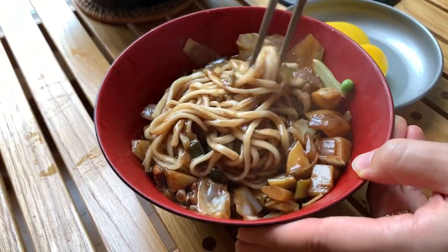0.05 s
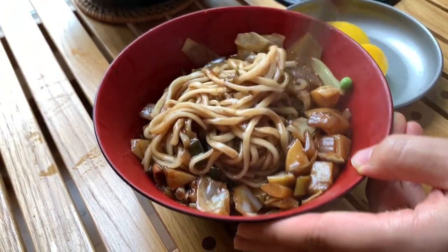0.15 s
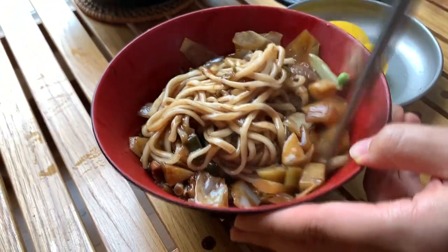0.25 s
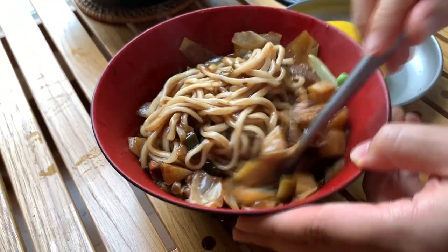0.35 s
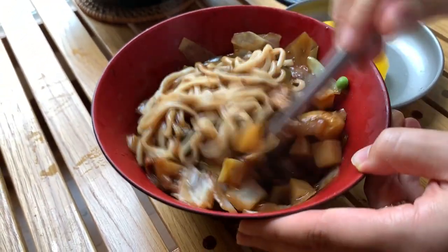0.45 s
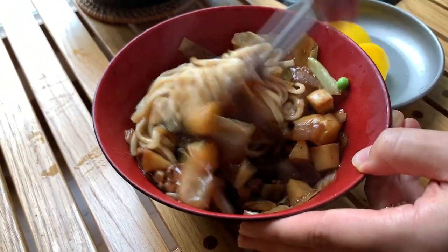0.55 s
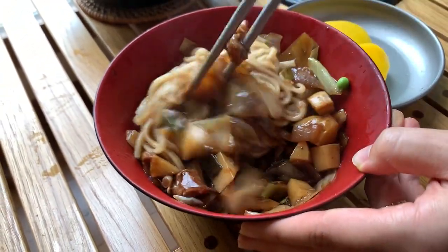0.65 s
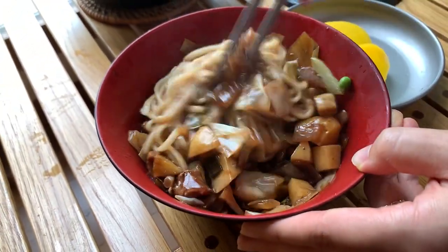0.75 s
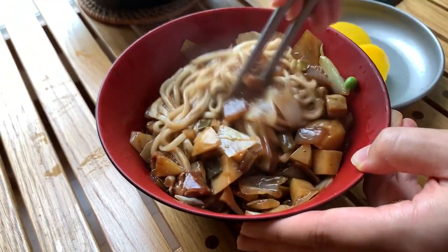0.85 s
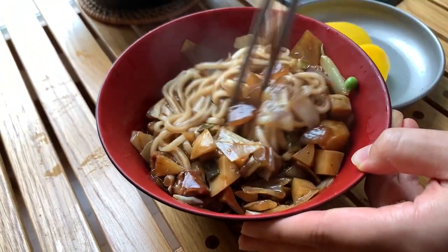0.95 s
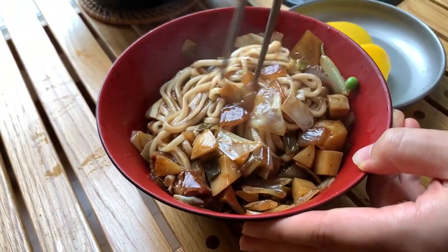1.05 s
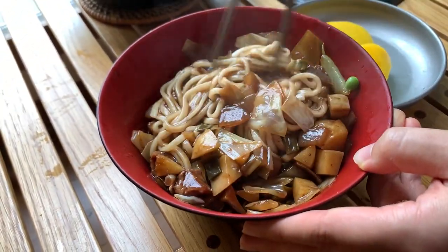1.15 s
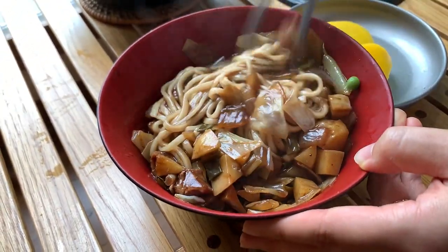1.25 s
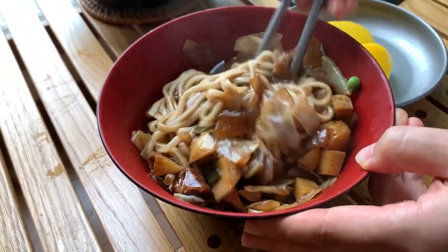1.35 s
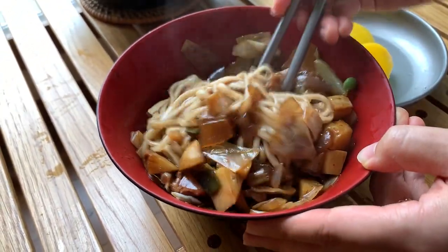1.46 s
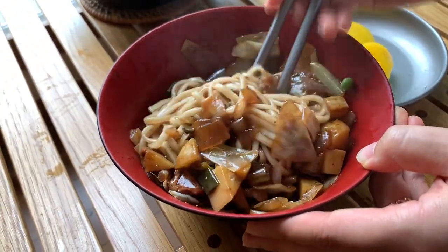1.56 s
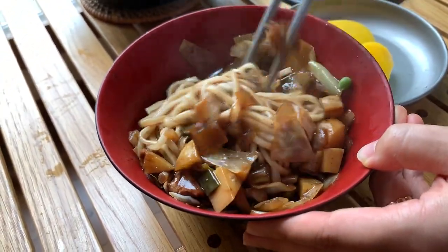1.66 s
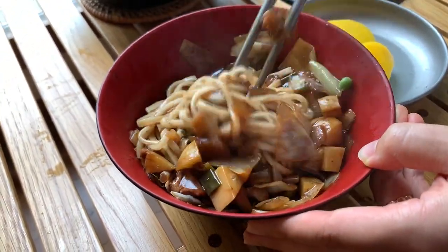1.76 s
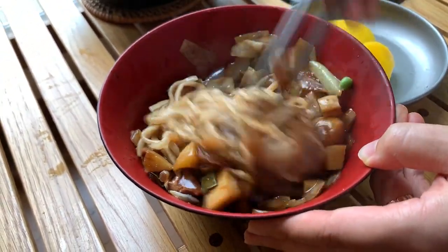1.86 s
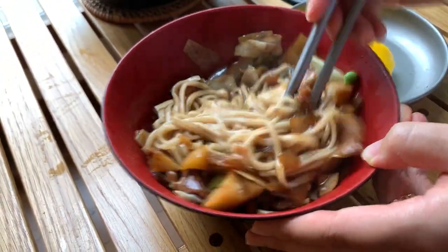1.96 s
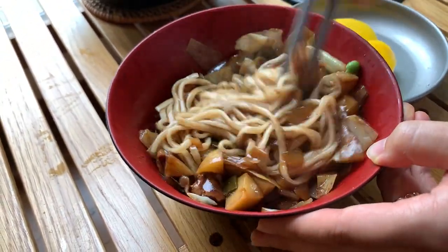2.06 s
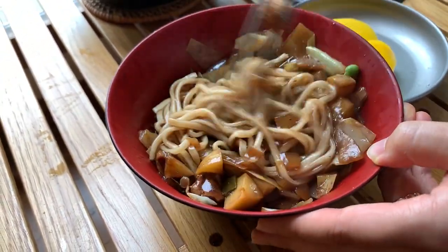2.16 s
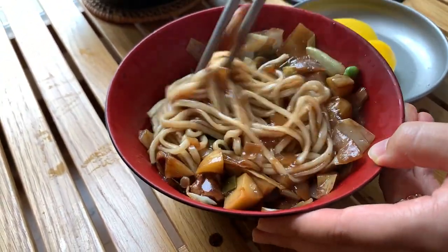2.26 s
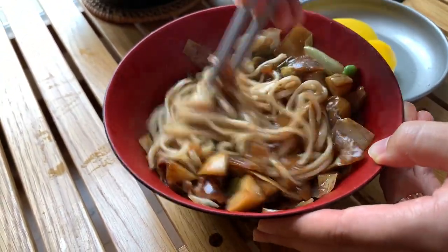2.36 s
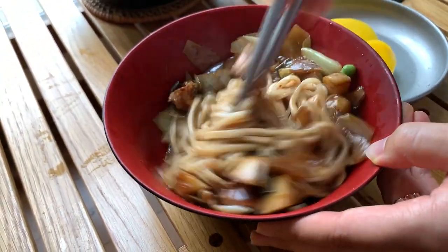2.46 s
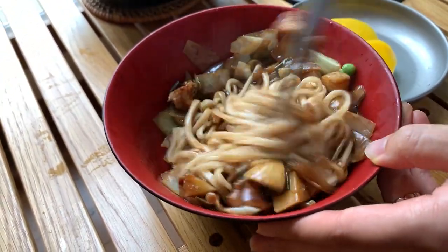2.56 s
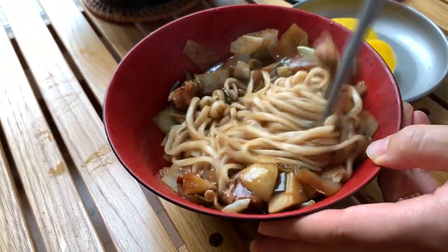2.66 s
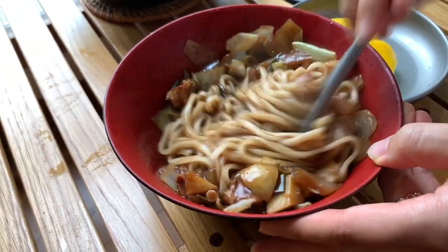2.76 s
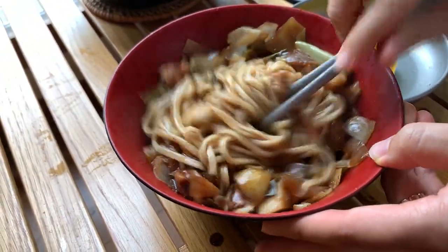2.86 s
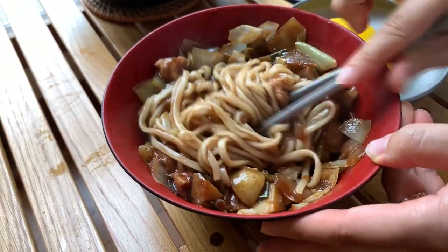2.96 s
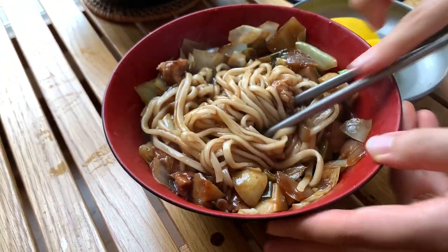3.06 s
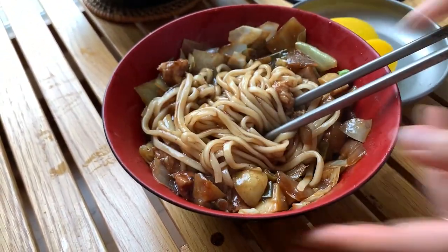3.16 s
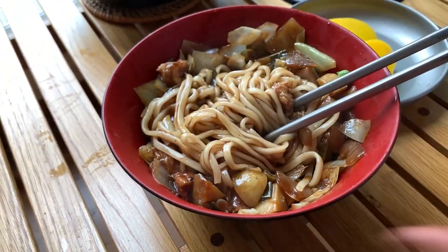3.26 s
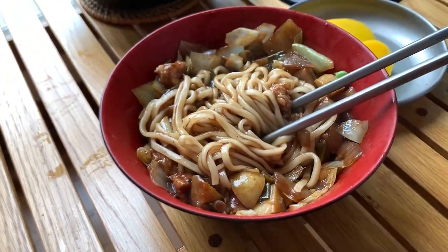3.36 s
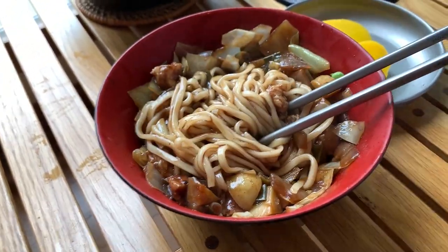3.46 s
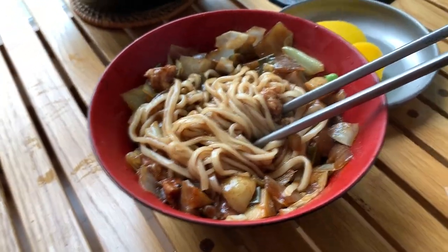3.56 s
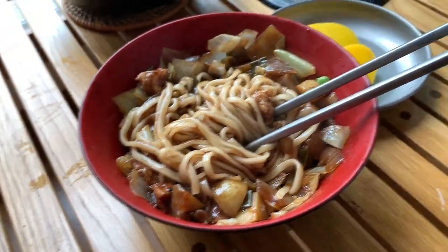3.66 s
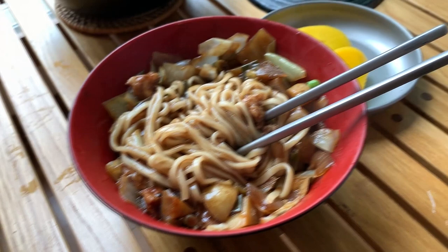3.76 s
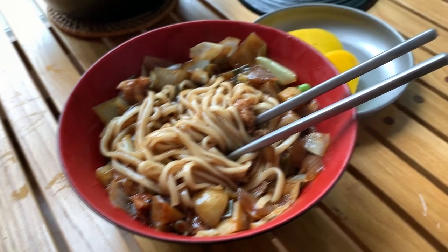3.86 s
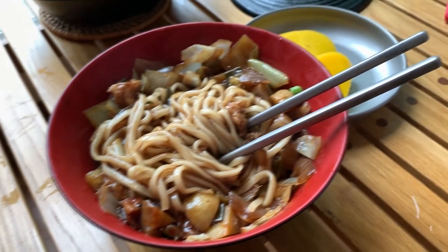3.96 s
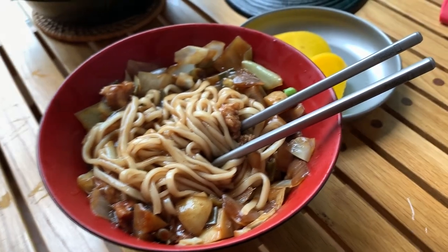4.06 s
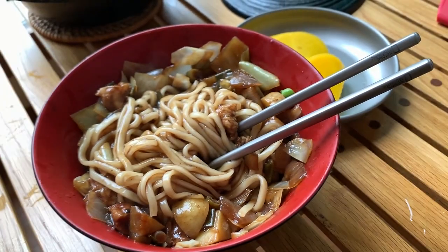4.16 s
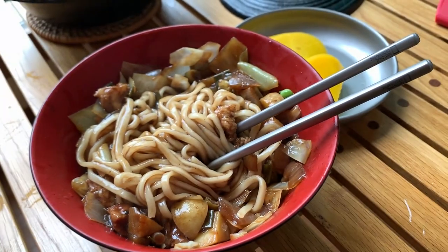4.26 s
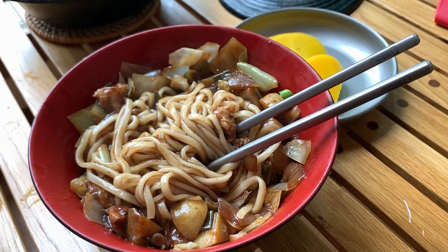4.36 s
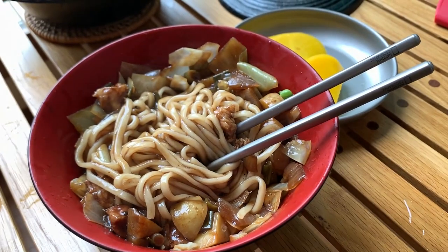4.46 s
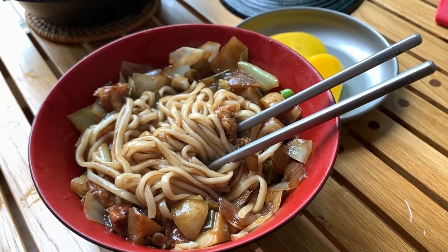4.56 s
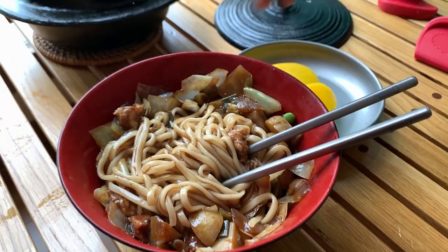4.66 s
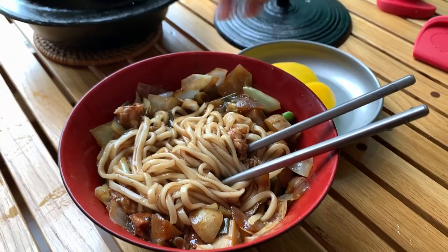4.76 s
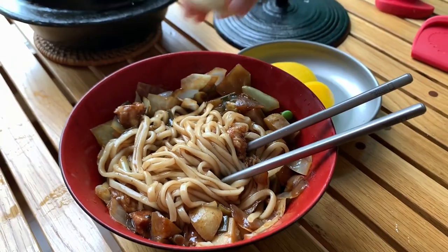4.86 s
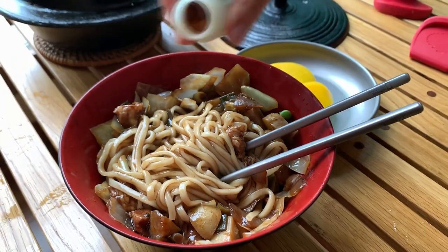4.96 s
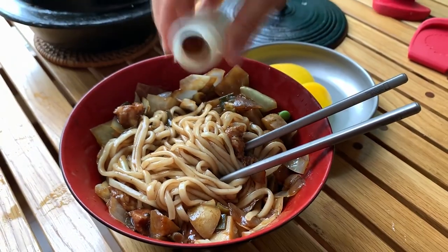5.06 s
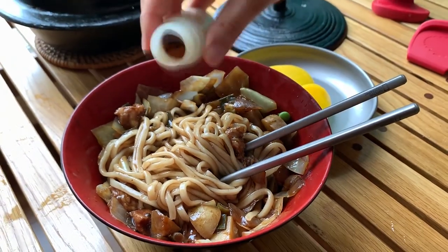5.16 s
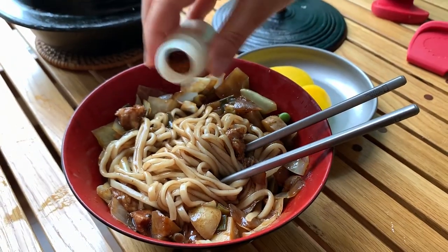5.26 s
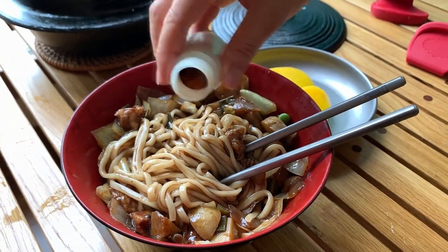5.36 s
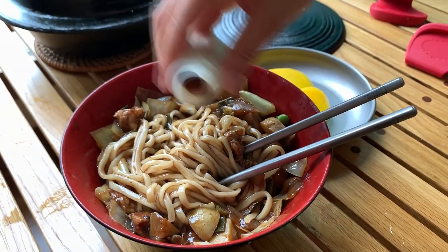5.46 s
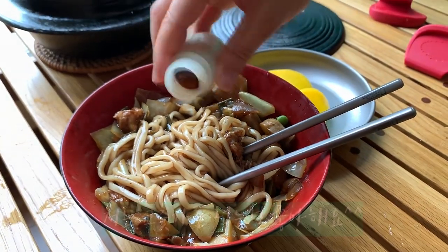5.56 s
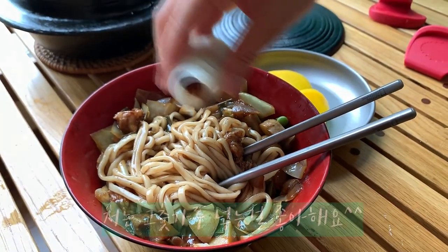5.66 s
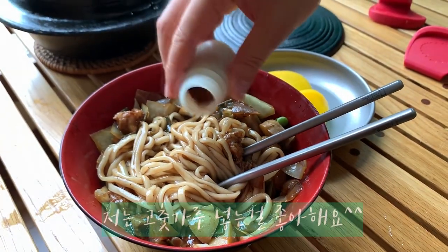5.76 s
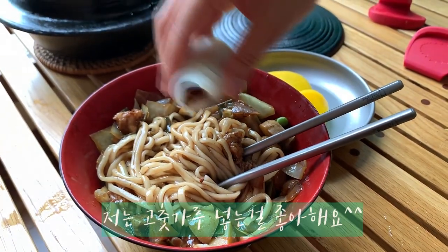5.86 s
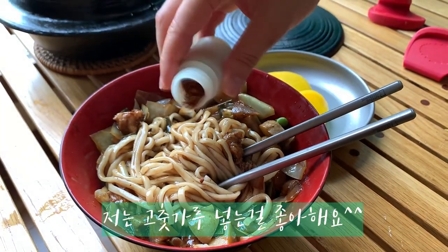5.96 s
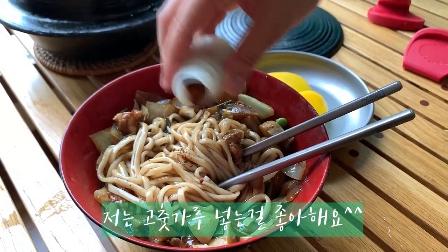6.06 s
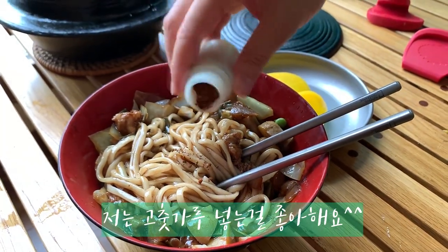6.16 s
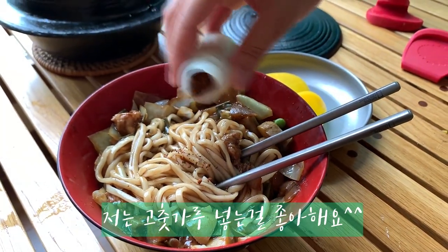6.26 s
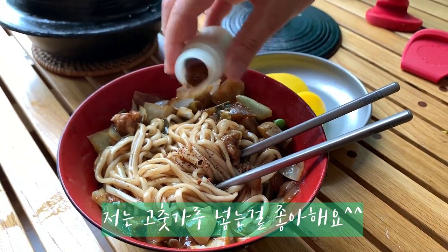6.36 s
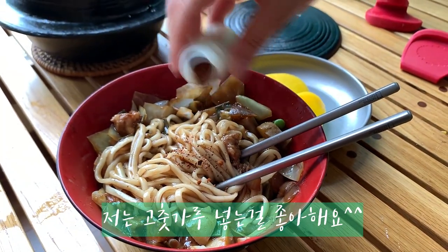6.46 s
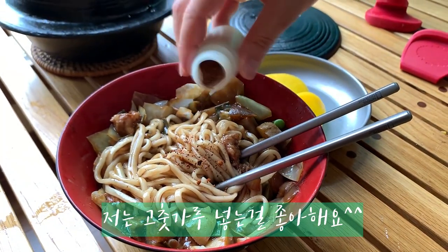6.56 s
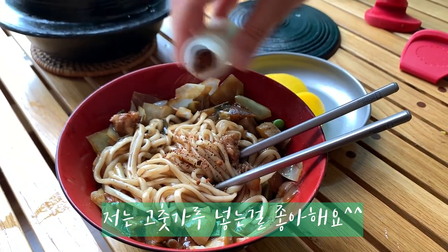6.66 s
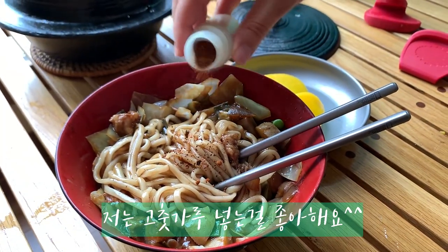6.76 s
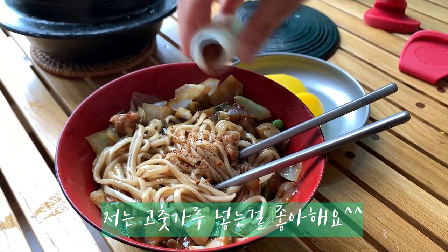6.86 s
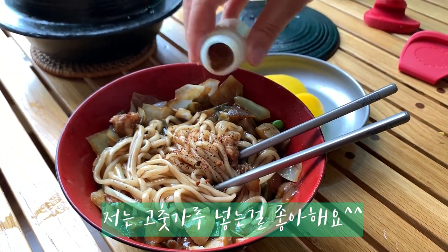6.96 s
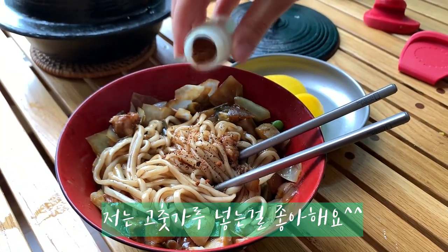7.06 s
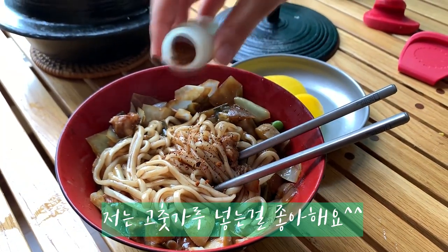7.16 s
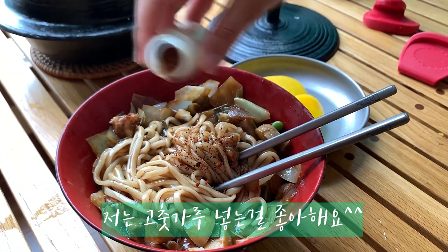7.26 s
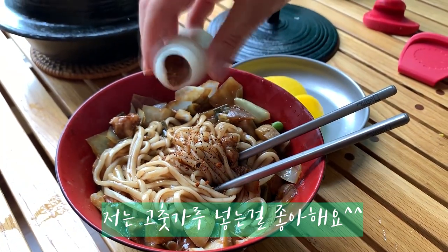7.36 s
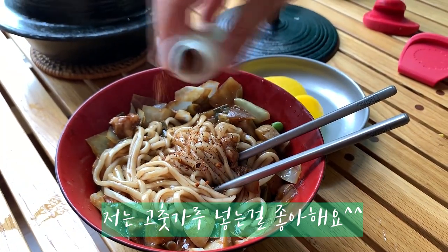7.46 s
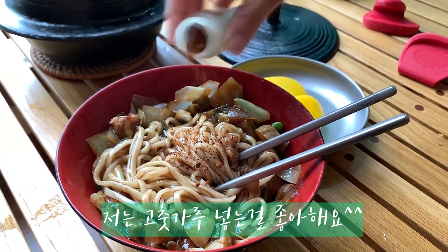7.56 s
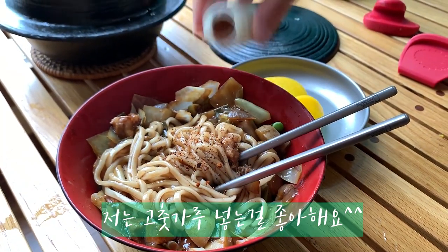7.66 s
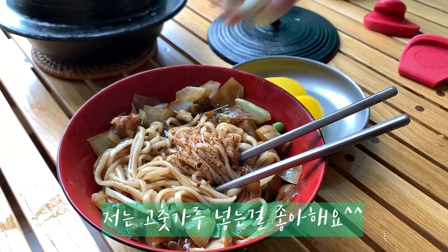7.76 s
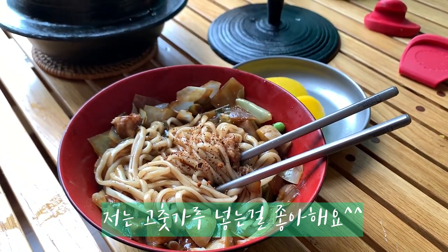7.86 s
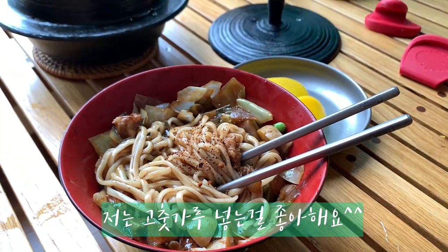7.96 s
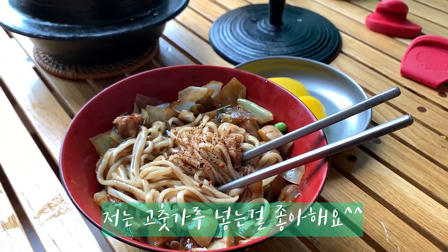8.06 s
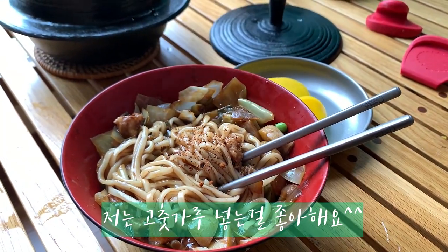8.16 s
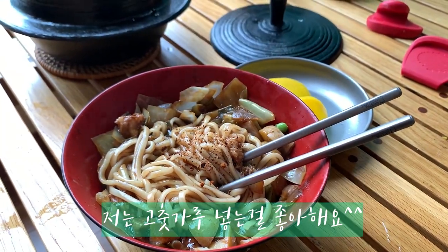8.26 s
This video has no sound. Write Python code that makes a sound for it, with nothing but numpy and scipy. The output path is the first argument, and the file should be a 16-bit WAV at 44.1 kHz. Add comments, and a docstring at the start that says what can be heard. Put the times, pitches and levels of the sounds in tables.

```python
"""Steel chopsticks turn sauced noodles in a bowl, click on its wall and are laid down: struck modes with cracks of
contact, over snapping sauce films, squelch and groans. Then a pepper shaker swishes, ticks and clinks.
Metal clatters nearby (noise-driven modes, beating tones); the wooden table takes bumps and knocks (modes).
Shaped noise makes a rain-like hiss and a far rush, noise and sines a low hum. Two close microphone ports hear it."""
import sys
import numpy as np
from scipy import signal
from scipy.fft import rfft, irfft, next_fast_len
from scipy.io import wavfile
from scipy.ndimage import uniform_filter1d

SR = 44100
rng = np.random.default_rng(int(sys.argv[2]) if len(sys.argv) > 2 else 0)


def persist_wave(psi):
    """Save psi, clipped to +-1, as 16-bit WAV."""
    counts = np.round(np.clip(psi, -1, 1) * 32767).astype(np.int16)
    wavfile.write(sys.argv[1], SR, np.atleast_2d(counts).T)


N = 366471
T = np.arange(N) / SR  # scene time [s]
AGE = T[:SR // 2]  # time since a hit [s]

# steel on crockery: (time [s], touched bowl spot [Hz], bowl level [dB], touched steel spot [Hz], steel level [dB],
# tip level [dB], tip pitch [Hz], bowl lean to the left [dB])
CLICKS = [(0.2877, 1440, -29, 3300, -21, -17.5, 8240, 17), (0.358, 1250, -36, 2900, -43, -48, 7900, 5),
          (0.8245, 855, -18, 3170, -23.5, -27, 7900, 2), (1.297, 1290, -29, 3200, -20, -26.5, 8500, 5),
          (1.321, 1150, -24, 3000, -30, -44, 8500, 2), (1.9907, 1080, -32, 3500, -34.5, -41.5, 8500, 5),
          (2.3482, 1470, -25, 2150, -27.5, -34, 8100, 12), (2.7835, 700, -29.5, 3000, -32, -43, 6900, 4),
          (2.7845, 1460, -26.5, 2610, -35, -42, 8150, 4), (2.810, 1480, -33.5, 3000, -43, -48, 8400, 3),
          (2.9937, 790, -43, 3700, -33.5, -21.5, 8700, 4)]
# full bowl's modes: (frequency [Hz], level [dB], t60 [s])
BOWL_MODES = [(720, 0, 0.024), (870, 3, 0.015), (1110, -4, 0.025), (1200, -0.5, 0.025), (1430, 1.5, 0.026),
              (1640, -1, 0.021)]
# held shafts' modes: (frequency [Hz], level [dB], t60 [s])
SHAFT_MODES = [(1730, 13.5, 0.013), (2430, 4.5, 0.015), (2730, 3, 0.011), (3070, 1.5, 0.012),
               (3394, -0.5, 0.014), (4130, -3, 0.012), (4750, 2, 0.014)]
# chopstick tip modes: (multiple of tip pitch, level [dB], t60 [s])
TIP_MODES = [(.95, -26, 0.037), (1.01, 25, 0.0039), (1.22, -14, 0.0026), (1.4, -3, 0.023),
             (1.75, 6, 0.0087)]

# strokes through the noodles: (time of hardest pull [s], crackle level [dB])
STROKES = [(0.52, -46), (1.36, -49.5), (1.89, -44), (2.38, -49), (2.63, -43)]
STROKE_RISE_DB_PER_S, STROKE_FALL_DB_PER_S = 139, 42
STIR_END_S, IDLE_CRACKLE_DB = 3.4, -60.5  # between strokes the noodles keep settling
# clearest sauce films snapping: (time [s], relative level [dB], pitch [Hz])
SMACKS = [(0.4878, -28, 8200), (0.557, -25.5, 8650), (0.6575, -26, 8800), (1.2394, -25, 10400),
          (1.736, -26, 8500), (1.855, -25, 8640), (1.908, -26, 8900), (1.9185, -22, 8660),
          (1.929, -27, 11000), (1.960, -25, 8900), (2.037, -32, 7800), (2.061, -31, 10500),
          (2.3013, -31, 7850), (2.5303, -29, 7730), (2.834, -27, 8400)]
# spectrum of a film snap: (frequency [Hz], level [dB])
SNAP_COLOUR = [(1500, -23), (4000, -7), (8400, -6.5), (11000, -7.5), (15500, -13)]
PING_HZ, PING_SPREAD_OCT = 8700, 0.1

# shoves of the heap over the bowl: (time [s], slosh [dB], groan [dB], squish [dB], slosh fall [dB/s])
SHOVES = [(2.594, -32.5, -41, -32, 120), (2.684, -31.5, -33, -37, 300), (2.712, -44, -32, -57, 220)]
# slosh spectrum: (frequency [Hz], level [dB])
SLOSH_COLOUR = [(150, -7.5), (280, -2), (390, 3), (550, -9), (900, -1), (1350, -0.5), (2000, -12.5),
                (4500, -14.5), (8000, -20.5), (15000, -33)]
SHOVE_RISE_DB_PER_S = 550
SQUISH_LEAD_S, SQUISH_RISE_DB_PER_S, SQUISH_FALL_DB_PER_S = 0.0075, 1100, 450
GROAN_HZ, GROAN_RISE_DB_PER_S, GROAN_FALL_DB_PER_S = 384.6, 1500, 1100

# chopsticks slide to rest on the rim
SLIDE_S, SLIDE_DB, SLIDE_RISE_DB_PER_S, SLIDE_FALL_DB_PER_S = 3.028, -30, 448, 652

# dry ticks, chopsticks let go and shaker handled: (time [s], level [dB], pitch [Hz])
TICKS = [(3.05, -41.5, 2200), (5.426, -45, 3000), (6.15, -44, 1500), (7.724, -39, 2400), (7.767, -41, 2880),
         (7.780, -39.5, 2200)]
# light touches that ring the shaker: (time [s], level [dB], touched spot [Hz])
CLINKS = [(4.851, -35, 2300), (5.835, -32, 1170), (6.555, -39, 2300)]
# shaker's modes: (frequency [Hz], level [dB], t60 [s])
SHAKER_MODES = [(756, -2, 0.073), (930, -1, .04), (1400, -6, 0.18), (1670, 6, .05), (2335, 5, .17),
                (4580, 2, 0.066)]

# handling and powder in the shaker: (time [s], relative hiss [dB], relative hollow body [dB], rise [s], t60 [s])
SWISHES = [(1.526, -33, -24, 0.014, 0.25), (3.606, -27, -25, 0.013, 0.16), (3.691, -31.5, -25, 0.019, 0.17),
           (4.25, -28.5, -28, 0.015, 0.17), (4.385, -34, -42, 0.02, 0.22), (4.645, -33.5, -26, 0.015, 0.16),
           (4.849, -42, -33, .007, 0.29), (4.974, -39, -36.5, 0.018, 0.85),
           (5.3902, -32.5, -34, 0.0047, 0.26), (5.506, -19, -24, 0.0042, 0.26),
           (5.802, -30, -27, 0.016, 0.14), (5.905, -33, -30.5, 0.0049, 0.18), (6.095, -37, -32, 0.009, .15),
           (6.485, -30, -26, 0.0022, 0.25), (6.547, -33.5, -27.5, 0.0054, 0.21),
           (6.84, -25.5, -25, 0.0032, 0.22), (7.834, -27, -30.5, 0.0053, 0.34),
           (7.969, -35.5, -30, 0.0061, 0.3)]
# swish hiss spectrum: (frequency [Hz], level [dB])
SWISH_COLOUR = [(1500, -2), (3000, 1.5), (5000, -1), (8000, 4.5), (12000, -0.5), (15500, -8)]
# hollow body spectrum: (frequency [Hz], level [dB])
SWISH_BODY_COLOUR = [(700, -23), (1100, -16), (1400, 6.5), (1850, -6.5), (2350, 4.5), (2800, -17),
                     (5000, -3.5), (8000, -44)]

# hard knocks on wood: (time [s], level [dB], crack's gain above 1500 Hz [dB])
KNOCKS = [(6.703, -17.5, 6), (7.032, -27.5, 0.92)]
# wood's modes: (frequency [Hz], level [dB], t60 [s])
WOOD_MODES = [(257, -10, 0.3), (434, -8.5, 0.42), (520, -13, 0.26), (603, -17, .12), (710, 2, 0.18),
              (753, -4, 0.11), (901, -2, 0.083), (1077, 0.5, 0.13), (1380, 4, 0.072), (1635, 1, .08),
              (1690, -1, 0.13), (2070, -11, .08), (2700, -9, .06), (3010, -6.5, 0.054)]
# crack of contact, spectrum: (frequency [Hz], level [dB])
KNOCK_COLOUR = [(150, -19), (300, 4), (800, 2), (1600, -2.5), (2500, -11.5), (4000, -15.5), (8000, -20.5),
                (15000, -34)]
# soft table bumps: (time [s], level [dB], pitch [Hz])
BUMPS = [(3.616, -29, 110), (4.078, -26.5, 82.4), (4.262, -16.5, 103)]

# crashes of the clatter: (time [s], relative level [dB])
CRASHES = [(0.733, -15), (0.845, -25), (0.91, -35.5)]
CRASH_RISE_DB_PER_S, CRASH_FALL_DB_PER_S = 1400, 195
CRASH_TAIL_DB, CRASH_TAIL_FALL_DB_PER_S = -11.5, 80  # level relative to its crash
SING_DB, SING_FALL_DB_PER_S = -16, 66  # level relative to its crash
# rattle spectrum: (frequency [Hz], level [dB])
RATTLE_COLOUR = [(120, -17), (350, -6), (600, -9.5), (900, -4.5), (1250, -9), (1550, -5), (2300, -9),
                 (3200, -10.5), (4700, -9.5), (6300, -10), (8000, -14), (11500, -17.5), (15500, -29)]
# broad metal modes: (frequency [Hz], width [Hz], level [dB])
CLATTER_MODES = [(930, 95, 3), (1486, 49, 2.5), (3190, 110, 6), (3800, 60, -3), (4300, 95, 1),
                 (4570, 90, 4), (4910, 100, 3), (5420, 110, 4), (7520, 120, -1), (7900, 180, -4)]
# thin tones the metal sings with: (frequency [Hz], level [dB])
CLATTER_TONES = [(882, 0), (977, 7), (1088, 0), (1495, -3), (2984, 2), (3434, 1), (3768, -5), (4614, -7)]

# rain-like hiss spectrum: (frequency [Hz], level [dB])
HISS_COLOUR = [(25, -12), (55, -9.5), (76, -5.5), (170, -9.5), (300, -12), (480, -12.5), (600, -12.5),
               (1000, -11), (1740, -16.5), (2350, -15.5), (3080, -20), (4870, -24), (8500, -33),
               (13000, -41.5), (16000, -54)]
# common level of hiss and patter: (time [s], relative level [dB])
HISS_LEVEL = [(0, -42.5), (2.7, -44), (3.3, -45), (6.4, -44.5), (8.3, -41.5)]
# far rush draws near, then stays
RUSH_DB, RUSH_NEAR_S, RUSH_RISE_DB_PER_S = -48, 7.9, 4.5
# low drone: (start [s], end [s], level [dB])
DRONE_SPELLS = [(0.66, 3.36, -42.5)]
DRONE_HZ, MAINS_HZ, MAINS_DB, RUMBLE_DB = 40.7, 51.1, -50, -52
# tone added to the resting hum: (start [s], end [s], level [dB])
HUM_SWELLS = [(0, 1.05, -54), (4.64, 5.06, -49.5), (5.82, 6.2, -49.5)]
HUM_HZ, HUM_DB = 244, -57

# likeness of diffuse sound at the two ports: (frequency [Hz], correlation)
LIKENESS = [(60, 0.93), (200, 0.99), (400, 0.46), (1000, 0.46), (3000, 0.015), (6000, 0.09), (8500, 0.97),
            (15000, 0.58)]
PORT_LAG_MS, TOP_HZ = 0.2556, 16200


def undb(db):
    """Decibels to gain."""
    return 10 ** (np.asarray(db) / 20)


def unit(x):
    """Scale to rms 1."""
    return x / np.sqrt(np.mean(x ** 2))


def struck(x):
    """Scale a hit to rms 1 over its first 10 ms."""
    return x / np.sqrt(np.mean(x[..., :SR // 100] ** 2))


def curve(rows):
    """Gain over time from (time [s], level [dB]) rows."""
    return undb(np.interp(T, *np.transpose(rows)))


def across(hz, points):
    """Read (frequency [Hz], value) points on a log-frequency axis."""
    f, v = np.transpose(points)
    return np.interp(np.log(hz + 1), np.log(f), v)


def colour(x, points):
    """Give x a (frequency [Hz], level [dB]) spectrum, at rms 1."""
    n = next_fast_len(x.shape[-1])
    hz = np.arange(n // 2 + 1) * SR / n
    shaped = irfft(rfft(x, n) * undb(across(hz, points)), n)
    return unit(shaped[..., :x.shape[-1]])


def noise(n):
    """Diffuse noise at the two ports; mid and side shares set their correlation."""
    m = next_fast_len(n)
    alike = across(np.arange(m // 2 + 1) * SR / m, LIKENESS)
    mid, side = rfft(rng.standard_normal((2, m))) * np.sqrt([1 + alike, 1 - alike])
    return unit(irfft(np.array([mid + side, mid - side]), m)[:, :n])


def walk(rate_hz):
    """Slow random wander, rms 1."""
    k = int(SR / rate_hz)
    steps = np.repeat(rng.standard_normal(N // k + 1), k)
    return unit(uniform_filter1d(steps, k)[:N])


def tone(hz, wander_hz, rate_hz):
    """Sine of rms 1 whose pitch wanders."""
    return np.sqrt(2) * np.sin(2 * np.pi * np.cumsum(hz + wander_hz * walk(rate_hz)) / SR)


def fade(t60):
    """Exponential decay, 60 dB in t60 seconds."""
    return np.exp(-np.log(1000) * AGE / max(t60, 1e-3))


def onset(rise_s):
    """Smooth rise from 0 to 1."""
    return 1 - np.exp(-(AGE / rise_s) ** 2)


def swell(s, db, rise_db_per_s, fall_db_per_s):
    """Gain that climbs to db at time s, then falls."""
    return undb(db - np.maximum(rise_db_per_s * (s - T), fall_db_per_s * (T - s)))


def spells(rows, ramp_s):
    """Gain held through each (start [s], end [s], level [dB]) row, with short ramps."""
    return sum(undb(db) * np.clip(np.minimum(T - start, end - T) / ramp_s + .5, 0, 1)
               for start, end, db in rows)


def ring(modes, scatter=0.):
    """Decaying modes, the same at both ports; scatter detunes them from blow to blow."""
    out = 0
    for hz, db, t60 in modes:
        detune, phase = rng.uniform(-1, 1, 2)
        wave = np.sin(2 * np.pi * (hz * (1 + scatter * detune) * AGE + phase))
        out = out + undb(db) * fade(t60) * wave
    return np.array([out, out])


def touched(modes, spot_hz, db_per_oct):
    """The touched spot favours the modes near its own pitch."""
    return [(hz, db - db_per_oct * abs(np.log2(hz / spot_hz)), t60) for hz, db, t60 in modes]


def pan(x, left_db):
    """Lean a pair to the left, by left_db between the ports."""
    return x * undb(np.array([[left_db], [-left_db]]) / 2)


def add(out, s, x):
    """Mix x into out at time s."""
    i = int(s * SR)
    out[:, i:i + x.shape[1]] += x[:, :N - i]


def chopsticks(thud_t60=0.036, crack=0.31, thud_share=0.37, spread_s=0.00068,
               bowl_focus_db_per_oct=16, steel_focus_db_per_oct=12):
    """The tip ticks first; a moment later shafts and food-damped bowl ring, with noise bursts of contact."""
    out = np.zeros((2, N))
    contact = onset(.0006)
    for s, hz, bowl_db, steel_hz, steel_db, tip_db, tip_hz, left_db in CLICKS:
        burst = noise(len(AGE))
        thud = colour(burst, [(200, -20), (hz / 2, -11), (hz, 0), (2 * hz, -6), (6000, -24)])
        thud = struck(thud * fade(thud_t60))
        snap = colour(burst, [(1200, -6.5), (2800, -5), (5000, 1.0), (7000, -6), (12000, -29)])
        snap = struck(snap * fade(0.033))
        spit = colour(burst, [(tip_hz / 2, -18), (tip_hz, 0), (1.5 * tip_hz, -4), (2 * tip_hz, -13)])
        spit = struck(spit * fade(.011))

        wall = struck(ring(touched(BOWL_MODES, hz, bowl_focus_db_per_oct), scatter=0.016))
        wall = pan(wall + thud_share * thud, left_db)
        shafts = struck(ring(touched(SHAFT_MODES, steel_hz, steel_focus_db_per_oct), scatter=0.0093))
        shafts = shafts + crack * snap
        tips = struck(ring([(k * tip_hz, db, t60) for k, db, t60 in TIP_MODES], scatter=0.014)) + .6 * spit

        add(out, s, undb(tip_db) * struck(tips * contact))
        add(out, s + spread_s, undb(bowl_db) * struck(wall * contact))
        add(out, s + spread_s, undb(steel_db) * struck(shafts * contact))
    return out


def sauce(smack_db=-4, snap_db=-3, blip_db=-11, blips_per_s=60, fizz_db=-5, fizz_per_s=260,
          squelch_db=-6, grain_db=4, spread_db=2.5, smack_t60=0.0079):
    """Strokes part wet noodles: films snap with tiny pings, few clear, many faint, over fizz and squelch."""
    out = np.zeros((2, N))
    stir = sum(swell(s, db, STROKE_RISE_DB_PER_S, STROKE_FALL_DB_PER_S) for s, db in STROKES)
    stir = np.maximum(stir, undb(IDLE_CRACKLE_DB) * (T < STIR_END_S))

    for s, db, hz in SMACKS:
        snap = colour(noise(len(AGE)), SNAP_COLOUR) * fade(.008)
        smack = ring([(hz, 0, smack_t60)]) + undb(snap_db) * snap
        add(out, s, undb(db + smack_db) * smack * onset(0.00025))

    # faint pings at random times, each with its own pitch, size and length
    chance = rng.random((300, 4))
    times = np.cumsum(-np.log(chance[:, 0])) / blips_per_s
    for s, (_, pitch, size, length) in zip(times, chance):
        if s < STIR_END_S:
            db = blip_db + spread_db * min(-np.log(size), 2)
            hz = PING_HZ * 2 ** (PING_SPREAD_OCT * (2 * pitch - 1))
            ping = np.sin(2 * np.pi * hz * AGE) * fade(smack_t60 * length)
            add(out, s, stir[int(s * SR)] * undb(db) * struck(np.array([ping, ping])))

    pops = (rng.random(N) < fizz_per_s / SR) * rng.standard_normal(N)
    fizz = colour(pops, SNAP_COLOUR)
    squelch = colour(noise(N), [(800, -14), (2400, 1), (5000, -6), (8500, -1), (12000, -6), (15500, -17)])
    squelch = squelch * unit(undb(grain_db * walk(250)))
    return out + (undb(fizz_db) * fizz + undb(squelch_db) * squelch) * stir


def drag(grain_db=2.2, groan_wander_hz=25, left_db=1):
    """At each shove wet noodles squish, the heap sloshes and the bowl groans at an unsteady pitch."""
    slosh = colour(noise(N), SLOSH_COLOUR) * unit(undb(grain_db * walk(400)))
    squish = colour(noise(N), [(1500, -14), (3000, 1), (4500, 2), (6000, -8), (8500, -5), (15000, -11)])
    groan = tone(GROAN_HZ, groan_wander_hz, 150)
    out = 0
    for s, slosh_db, groan_db, squish_db, fall in SHOVES:
        out = out + slosh * swell(s, slosh_db, SHOVE_RISE_DB_PER_S, fall)
        out = out + groan * swell(s, groan_db, GROAN_RISE_DB_PER_S, GROAN_FALL_DB_PER_S)
        out = out + squish * swell(s - SQUISH_LEAD_S, squish_db, SQUISH_RISE_DB_PER_S, SQUISH_FALL_DB_PER_S)
    return pan(out, left_db)


def slide(grain_db=3):
    """Steel skids briefly over the rim: a thin, grainy scrape of noise with peaks in its spectrum."""
    scrape = colour(noise(N), [(1200, -10), (2600, -2), (3100, -12), (3700, 4), (5400, -15), (6600, 3),
                               (7300, -7), (8400, -2), (10000, -1), (11900, 1), (13200, -13), (15500, -6)])
    scrape = scrape * unit(undb(grain_db * walk(900)))
    return scrape * swell(SLIDE_S, SLIDE_DB, SLIDE_RISE_DB_PER_S, SLIDE_FALL_DB_PER_S)


def ticks(t60=0.043):
    """Dull, damped noise ticks of handling; taps ring the shaker's modes."""
    out = np.zeros((2, N))
    for s, db, hz in TICKS:
        tick = colour(noise(len(AGE)), [(hz / 4, -18), (.7 * hz, 0), (1.3 * hz, 0), (3 * hz, -12), (15000, -26)])
        add(out, s, undb(db) * struck(tick * fade(t60) * onset(0.00036)))
    for s, db, hz in CLINKS:
        clink = ring(touched(SHAKER_MODES, hz, db_per_oct=11))
        add(out, s, undb(db) * struck(clink * onset(0.0012)))
    return out


def swishes(hiss_db=-8, body_db=-8, lead_s=0.0046, body_lag_s=0.0066, grain_db=2.0, left_db=3):
    """Short grainy slides: a bright hiss swells first, a hollow body follows."""
    out = np.zeros((2, N))
    for s, hiss, body, rise_s, t60 in SWISHES:
        shape = fade(t60) * onset(rise_s)
        bright = colour(noise(len(AGE)), SWISH_COLOUR)
        hollow = pan(colour(noise(len(AGE)), SWISH_BODY_COLOUR), left_db)
        add(out, s - lead_s, undb(hiss + hiss_db) * shape * bright)
        add(out, s - lead_s + body_lag_s, undb(body + body_db) * shape * hollow)
    return out * undb(grain_db * walk(400))


def table(mode_db=-1.0, twin_db=-6, crack_db=-6, crack_t60=0.19, bump_t60=0.11, bump_rise_s=0.0069, left_db=2):
    """Hard knocks ring the wood, each mode with a detuned twin; soft bumps ring a few low modes."""
    out = np.zeros((2, N))
    for s, db, treble_db in KNOCKS:
        spectrum = [(hz, d + treble_db * (hz > 1500)) for hz, d in KNOCK_COLOUR]
        crack = struck(colour(noise(len(AGE)), spectrum) * fade(crack_t60))
        wood = struck(ring(WOOD_MODES) + undb(twin_db) * ring(WOOD_MODES, scatter=0.063))
        knock = undb(mode_db) * wood + undb(crack_db) * crack
        add(out, s, undb(db) * pan(knock, left_db) * onset(0.00092))
    for s, db, hz in BUMPS:
        bump = ring([(hz, 0, bump_t60), (245, -8, .07), (380, -12, .06)])
        add(out, s, undb(db) * bump * onset(bump_rise_s))
    return out


def clatter(ring_db=-5, rattle_db=-2, grain_db=3.0, sing_beat_db=4, sing_wander_hz=14, low_lag_s=.006):
    """Noise keeps broad metal modes ringing, lows a little late; crashes drop fast, leaving beating tones."""
    # a mode's t60 follows from its width
    modes = ring([(hz, db, np.log(1000) / np.pi / width) for hz, width, db in CLATTER_MODES])
    ringing = unit(signal.fftconvolve(noise(N), modes[:1], axes=1)[:, :N])
    rattle = colour(noise(N), RATTLE_COLOUR) * undb(grain_db * walk(700))
    power = sing_power = 0
    for s, db in CRASHES:
        power = power + swell(s, db, CRASH_RISE_DB_PER_S, CRASH_FALL_DB_PER_S) ** 2
        power = power + swell(s, db + CRASH_TAIL_DB, CRASH_RISE_DB_PER_S, CRASH_TAIL_FALL_DB_PER_S) ** 2
        sing_power = sing_power + swell(s, db + SING_DB, CRASH_RISE_DB_PER_S, SING_FALL_DB_PER_S) ** 2
    crash = (undb(ring_db) * ringing + undb(rattle_db) * rattle) * np.sqrt(power)

    lows = signal.sosfiltfilt(signal.butter(4, 1800, fs=SR, output="sos"), crash)
    out = crash - lows
    add(out, low_lag_s, lows)

    tones = 0
    for hz, db in CLATTER_TONES:
        beat = undb(db + sing_beat_db * walk(34.95))
        cycles = np.cumsum(hz + sing_wander_hz * walk(89.9)) / SR
        tones = tones + beat * np.sin(2 * np.pi * (cycles + rng.random((2, 1))))  # own phase at each port
    return out + unit(tones) * np.sqrt(sing_power)


def rain(hiss_db=2, drop_db=-12, left_db=2.0):
    """Rain-like: a gently wavering noise hiss with fine, grainy patter."""
    hiss = colour(noise(N), HISS_COLOUR) * undb(.7 * walk(7))
    patter = colour(noise(N), [(400, -22), (1000, 4.0), (2500, 9.0), (5000, 3.0), (12000, -22)])
    patter = patter * unit(undb(6.3 * np.minimum(walk(120), 2)))
    return pan(undb(hiss_db) * hiss + undb(drop_db) * patter, left_db) * curve(HISS_LEVEL)


def rush():
    """A far, low-pitched rush of noise, growing like an approaching car."""
    far = colour(noise(N), [(120, 1), (260, 2.0), (450, 21.5), (800, -3), (1500, -12), (4000, -51)])
    return far * swell(RUSH_NEAR_S, RUSH_DB, RUSH_RISE_DB_PER_S, 0)


def hums(drone_wander_hz=2.45, hum_waver_db=2.0, hum_wander_hz=4):
    """Low rumble, a mains line, a deep drone for a while, and a wavering hum that swells into a tone."""
    rumble = colour(rng.standard_normal(N), [(20, -64), (34, -12), (42, -10), (50, -1.0), (58, -4.5),
                                             (90, -20), (300, -80)])
    mains = np.sqrt(2) * np.sin(2 * np.pi * MAINS_HZ * T)
    drone = tone(DRONE_HZ, drone_wander_hz, 6) * spells(DRONE_SPELLS, ramp_s=0.07)
    blur = colour(noise(N), [(150, -58), (228, -20.5), (243, -16.0), (259, -20.5), (400, -86)])
    firm = tone(HUM_HZ, hum_wander_hz, 15) * spells(HUM_SWELLS, ramp_s=0.042)
    hum = (undb(HUM_DB) * blur + firm) * undb(hum_waver_db * walk(11))
    return undb(RUMBLE_DB) * rumble + undb(MAINS_DB) * mains + drone + hum


def room(x, wet_db=-15, t60=0.17):
    """A short tail of decaying noise from the table and the nearby walls."""
    tail = colour(noise(len(AGE)), [(300, -1.0), (3000, 3.5), (8000, -2.5), (15000, -19)])
    tail = tail * fade(t60) * onset(0.0021)
    tail = tail / np.sqrt(np.sum(tail[0] ** 2))
    return x + undb(wet_db) * signal.fftconvolve(x, tail, axes=1)[:, :N]


def scene():
    """Everything at the table, over the background."""
    hits = room(chopsticks() + sauce() + table() + ticks())
    return hits + drag() + slide() + swishes() + clatter() + rain() + rush() + hums()


def record(dry):
    """Sound reaches the left port a little later; the top is cut off."""
    n = next_fast_len(N + SR // 10)
    hz = np.arange(n // 2 + 1) * SR / n
    left = irfft(rfft(dry[0], n) * np.exp(-2j * np.pi * hz * PORT_LAG_MS / 1000), n)[:N]
    lowpass = signal.ellip(8, .2, 70, TOP_HZ, fs=SR, output="sos")
    return signal.sosfilt(lowpass, np.array([left, dry[1]]))


dry = scene()
out = record(dry)
persist_wave(out)
```